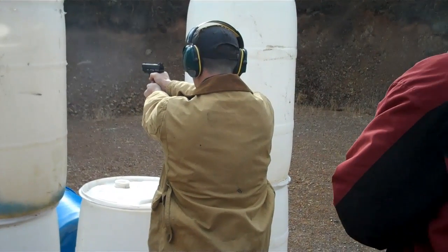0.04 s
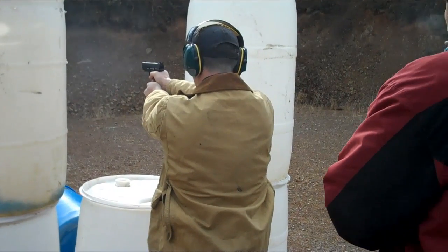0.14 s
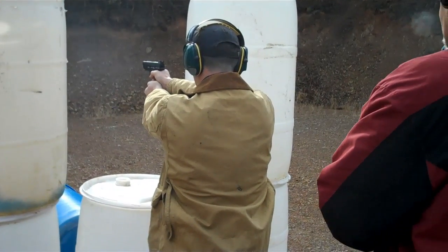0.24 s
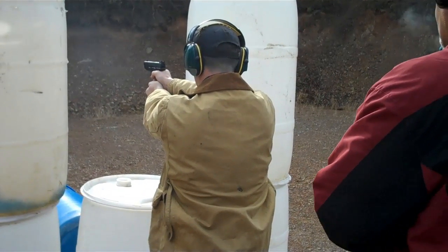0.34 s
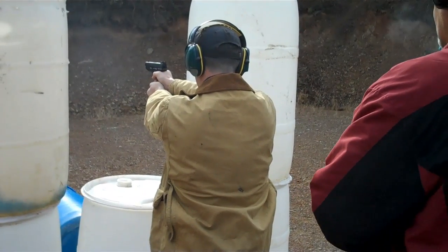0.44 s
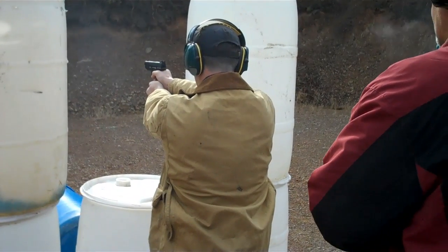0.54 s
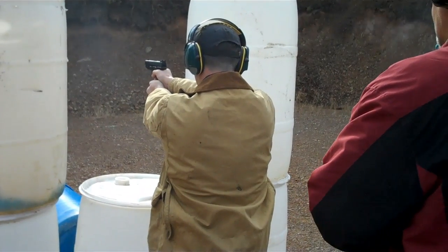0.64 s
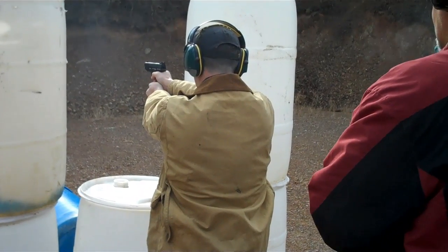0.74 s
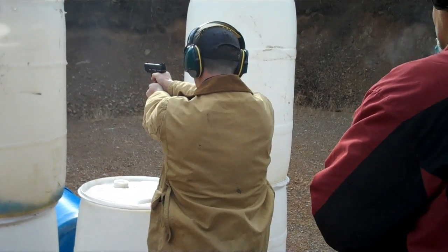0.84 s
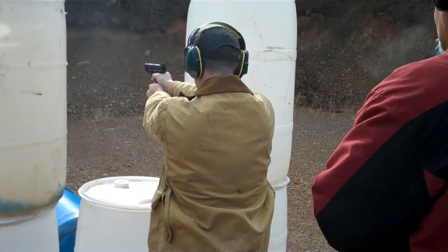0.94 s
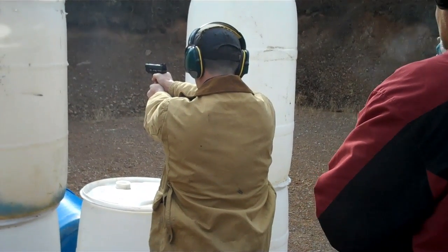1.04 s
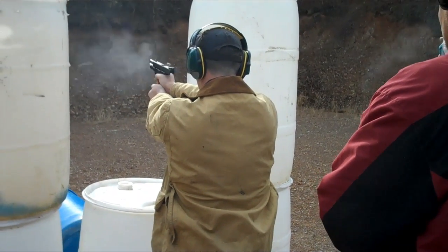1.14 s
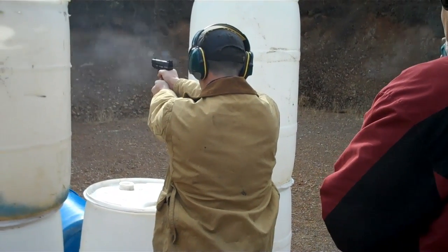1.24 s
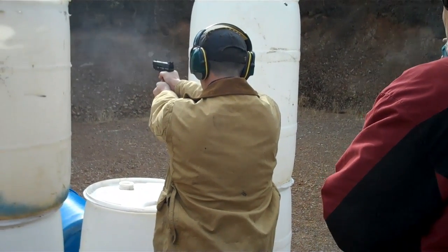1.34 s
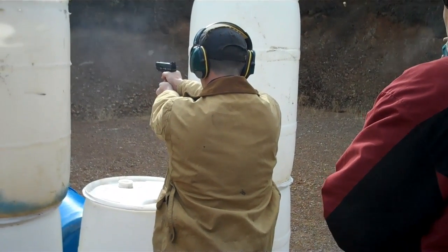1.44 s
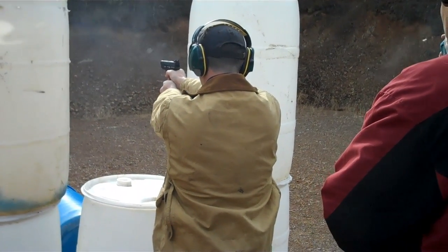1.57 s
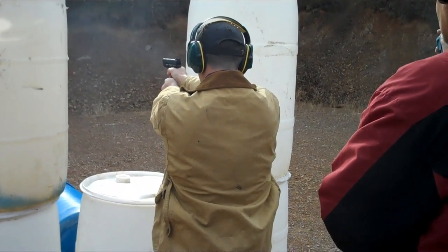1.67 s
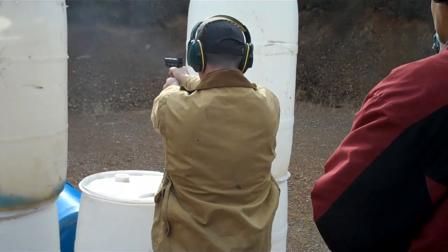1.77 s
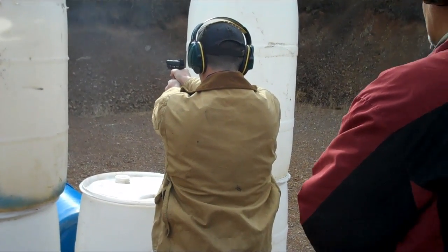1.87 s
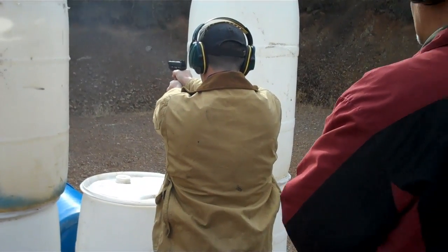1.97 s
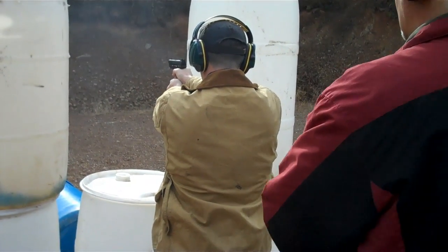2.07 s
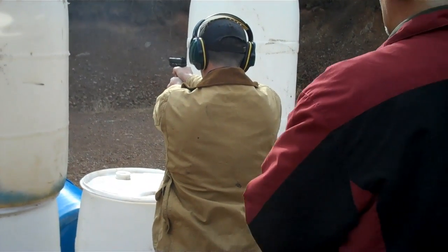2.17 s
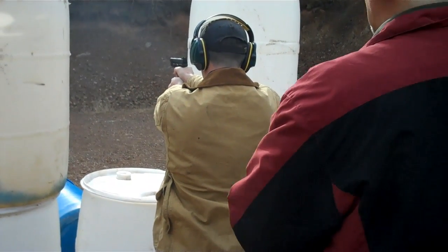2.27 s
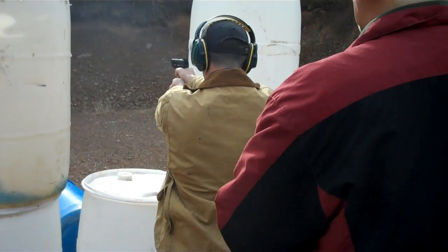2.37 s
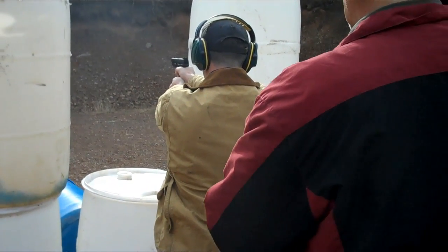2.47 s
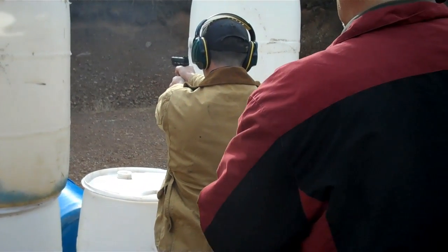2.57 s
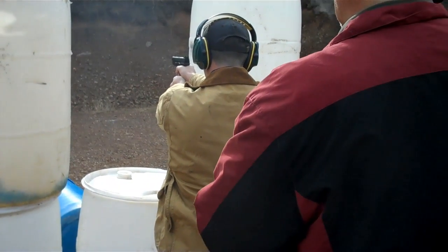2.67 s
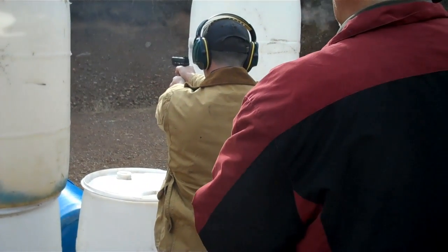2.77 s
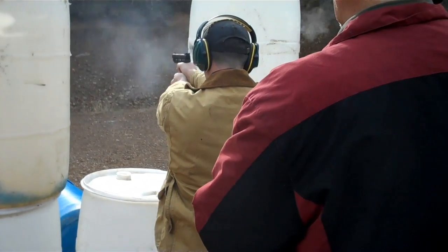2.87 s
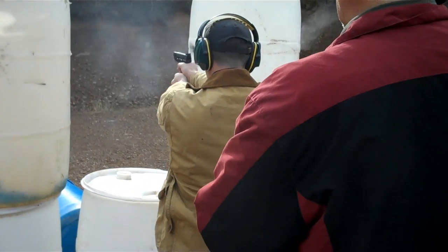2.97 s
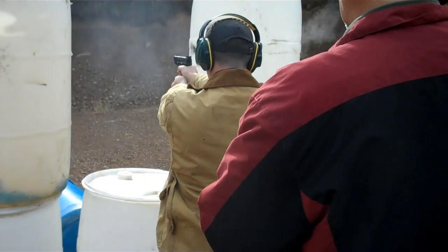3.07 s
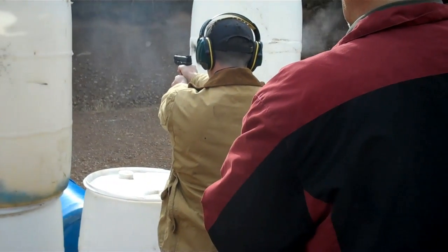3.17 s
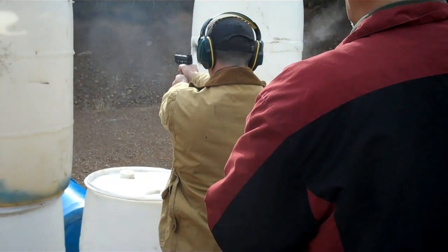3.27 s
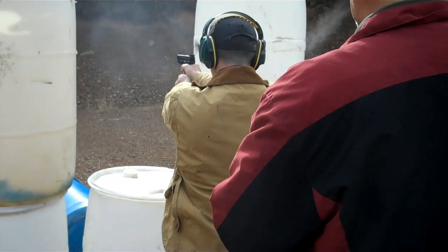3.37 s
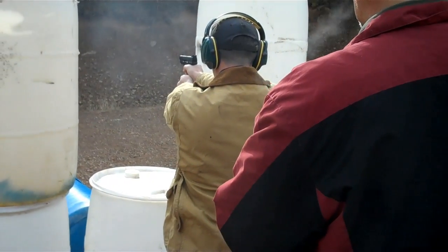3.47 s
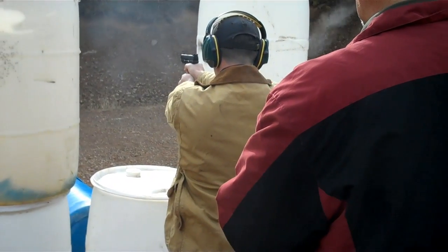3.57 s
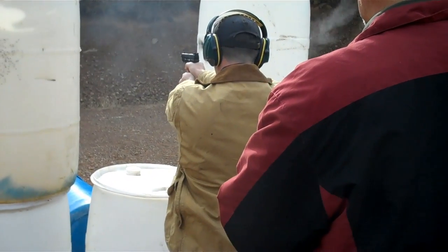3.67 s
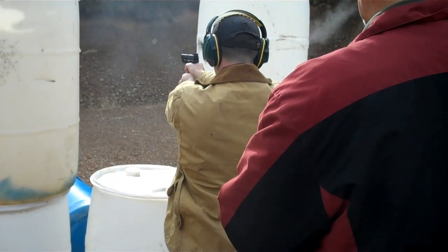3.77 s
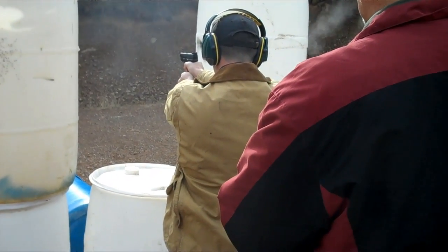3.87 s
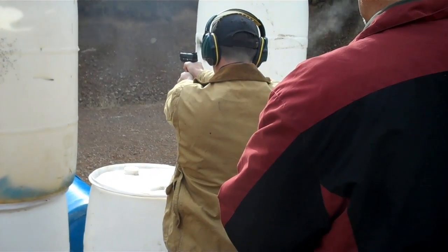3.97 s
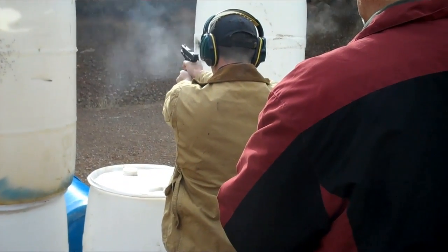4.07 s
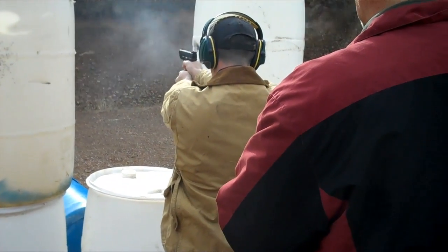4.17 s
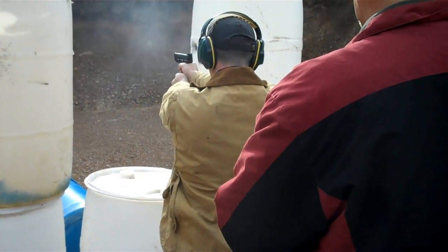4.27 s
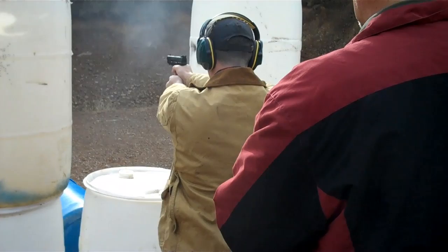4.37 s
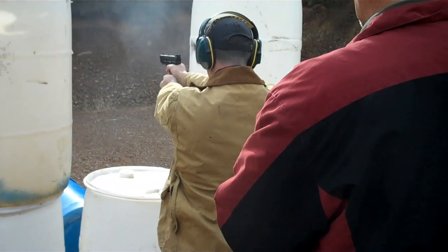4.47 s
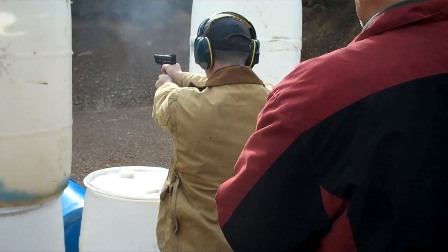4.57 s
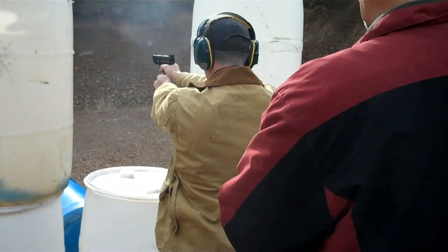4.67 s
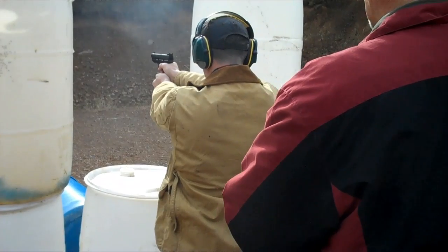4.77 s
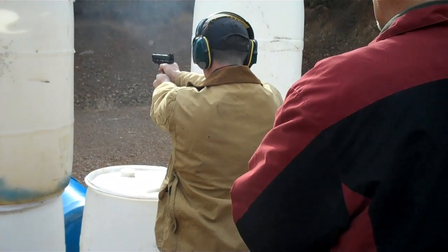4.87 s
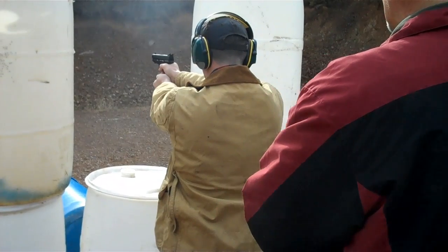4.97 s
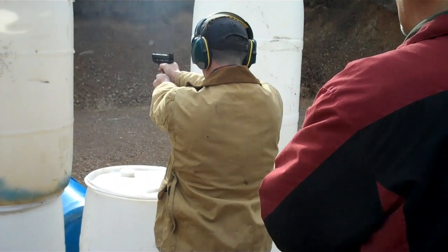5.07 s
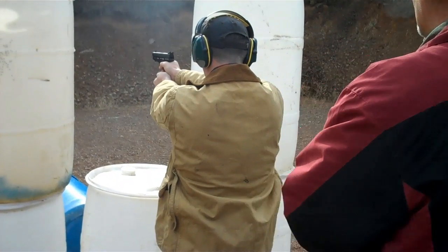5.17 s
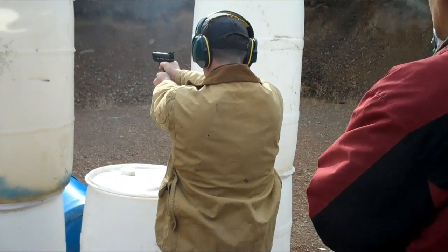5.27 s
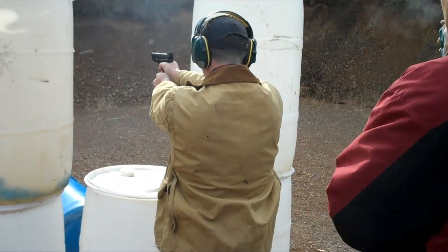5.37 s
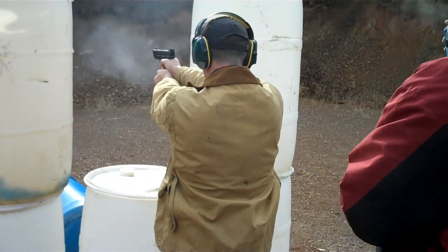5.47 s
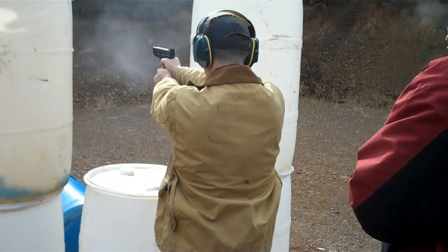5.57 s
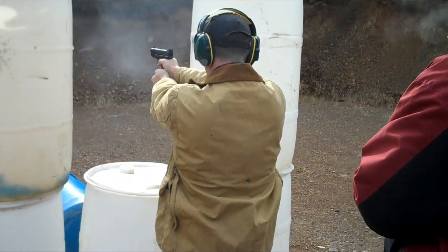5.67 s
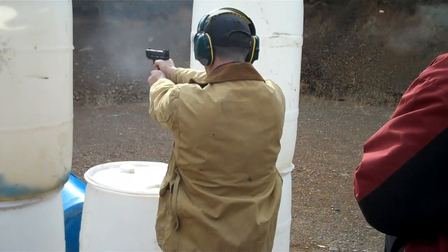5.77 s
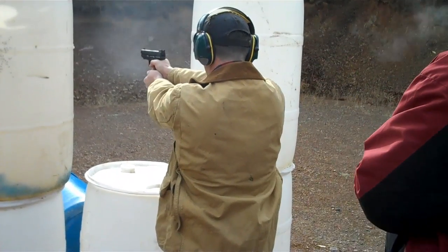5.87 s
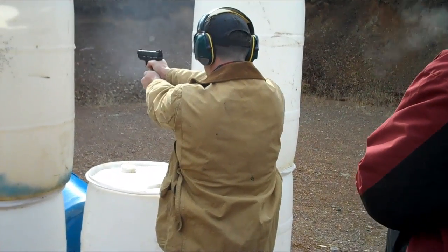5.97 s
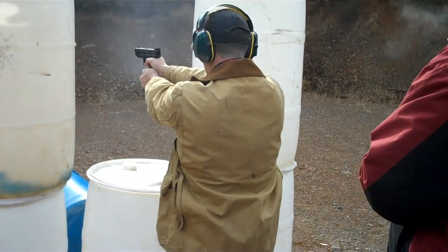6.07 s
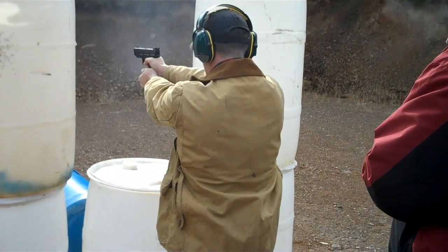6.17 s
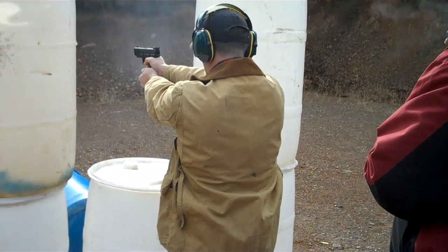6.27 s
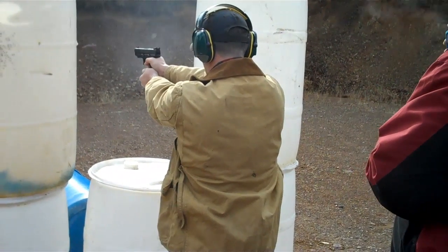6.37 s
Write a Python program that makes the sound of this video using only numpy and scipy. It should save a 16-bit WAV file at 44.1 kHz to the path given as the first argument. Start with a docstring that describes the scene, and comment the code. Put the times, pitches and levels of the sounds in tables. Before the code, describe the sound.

On an outdoor range, the roll of an earlier pistol shot is dying away. Four single shots follow, spaced over a second apart, each a harsh, overloaded blast with rapid slaps off nearby drums and banks, then a long roll that dulls as it fades. Ticks of grit and spent cases and small bumps fall between. A small stereo camera microphone close behind distorts and ducks after each blast.

```python
"""The roll of a pistol shot fired just before the start dies away, then four single shots follow.
Blasts are shaped noise bursts that slap back from drums and earth banks and return from the hills;
the roll is noise that dulls as it fades, and drums and steel ring on as decaying sines.
Noisy clicks are grit and spent cases on gravel, mode sums are bumps against the small camera;
hush and rustle lie behind, and the gain control drops after a blast and creeps back up."""
import sys
import numpy as np
from scipy import signal
from scipy.fft import rfft, irfft
from scipy.io import wavfile
from scipy.ndimage import uniform_filter1d

SR = 44100
rng = np.random.default_rng(int(sys.argv[2]) if len(sys.argv) > 2 else 0)


def transcribe(u):
    """Save the signal u as a 16-bit wav file named by the first command-line argument.

    u: samples, shape (n,) or (channels, n), limited to [-1, 1]; the rate is SR.
    q: integer samples, one column per channel.
    """
    v = np.clip(np.atleast_2d(u).T, -1, 1)
    q = np.round(v * 32767).astype(np.int16)
    wavfile.write(sys.argv[1], SR, q)


N = 283122
RANGE_SAMPLES, SMALL_SAMPLES = 2 * SR, 8000  # one shot's echoes, one small sound
STFT_SAMPLES = 512


def amp(db):
    """Amplitude factor of a level in dB."""
    return 10 ** (np.asarray(db) / 20)


def evened(x):
    """Scale to unit RMS."""
    return x / np.sqrt(np.mean(x ** 2) + 1e-20)


def peaked(x):
    """Scale to unit peak."""
    return x / np.max(abs(x))


def read(points, hz):
    """Interpolate a (Hz, value) curve over log frequency."""
    f, value = np.transpose(points)
    return np.interp(np.log(hz + 1), np.log(f + 1), value)


def fade(size, t60_s):
    """Exponential decay, 60 dB in t60_s."""
    return amp(-60 * np.arange(size) / SR / t60_s)


def add(mix, start_s, sound):
    """Mix in a stereo sound, cut at both ends of the mix."""
    at = round(start_s * SR)
    sound = sound[:, max(-at, 0):]
    part = mix[:, max(at, 0):][:, :sound.shape[1]]
    part += sound[:, :part.shape[1]]


# Each row: frequency in Hz, left-right likeness from 0 to 1.
STEREO_LIKENESS = [(60, 0.76), (180, 0.98), (550, 0.84), (1640, 0.54), (4960, 0.02), (14900, 0.05)]


def pair(size, alike):
    """Spectra of two noise channels, alike in the bass; alike scales the likeness."""
    hz = np.fft.rfftfreq(size, 1 / SR)
    left, other = rfft(rng.standard_normal((2, size)))
    same = np.clip(alike * read(STEREO_LIKENESS, hz), -1, 1)
    right = same * left + np.sqrt(1 - same ** 2) * other
    return hz, np.array([left, right])


# Each row: start in seconds, blast level in dB, left and right bias sag level in dB.
SHOTS = [(-.76, 8, 0, 0), (1.2197, 7.3, 3, 1), (2.8944, 6.8, 2.2, -3), (4.1351, 7.3, 2.2, -2),
         (5.4835, 7.3, 1.5, -2)]
# Each row, left then right capsule: sag start and end in seconds after the shot.
SAG_TIMES = [(.001, .0245), (.018, .026)]


def pistol():
    """All shots excite the same range and overload both capsules."""
    out = np.zeros((2, N))
    near = [pair(16384, NEAR_ALIKE)[1] for _ in near_returns()]
    far = [pair(32768, 1)[1] for _ in HILL_ECHOES]
    roll = pair(RANGE_SAMPLES, 1)[1]
    hop = STFT_SAMPLES // 2
    terrain = rng.standard_normal((hop + 1, RANGE_SAMPLES // hop + 2))  # frequency by time
    for start_s, blast_db, left_db, right_db in SHOTS:
        add(out, start_s, amp(blast_db) * echoes(near, far, roll, terrain))
        sags = [bias_sag(*times) for times in SAG_TIMES]
        add(out, start_s, amp([[left_db], [right_db]]) * sags)
    return out


def echoes(near, far, roll, terrain):
    """One shot as the range returns it: blast, slaps, hill echoes, roll and ringing drums."""
    out = np.zeros((2, RANGE_SAMPLES))
    add_near(out, near)
    add_hills(out, far)
    return out + rolling_tail(roll, terrain) + drum_rings()


REPEAT = .7  # amplitude share of the echo pattern common to all shots


def blended(common, alike):
    """The echo pattern shared by all shots, mixed with one of its own at equal total power."""
    hz, own = pair(2 * common.shape[-1] - 2, alike)
    return hz, REPEAT * common + np.sqrt(1 - REPEAT ** 2) * own


def burst(z, hz, colour, t60_s, tilt_db_per_octave, rise_s):
    """Coloured noise that rises and dies away."""
    tilt_db = tilt_db_per_octave * np.log2(hz / 1000 + .1)
    noise = evened(irfft(z * amp(read(colour, hz) + tilt_db)))
    t = np.arange(noise.shape[1]) / SR
    return noise * fade(len(t), t60_s) * (1 - np.exp(-t / rise_s))


# Slaps off drums and banks. Each row: delay in seconds, level in dB.
SLAPS = [(.016, -1.5), (.029, -5.5), (.047, -2.5), (.066, -8), (.086, -5), (.098, -11), (.114, -14)]
# Bright wash of the nearby ground: delay in seconds, level in dB, t60 in seconds, tilt in dB per octave.
GROUND_WASH = (.021, -14, .47, 3.3)
BLAST_T60_S, BLAST_TILT_DB_PER_OCTAVE = .085, 4.01
SLAP_T60_S, SLAP_TILT_DB_PER_OCTAVE = .056, -.8


def near_returns():
    """Direct blast, slaps and ground wash as rows of delay, level, t60 and tilt."""
    blast = (0, 0, BLAST_T60_S, BLAST_TILT_DB_PER_OCTAVE)
    slaps = [(delay_s, db, SLAP_T60_S, SLAP_TILT_DB_PER_OCTAVE) for delay_s, db in SLAPS]
    return [blast, *slaps, GROUND_WASH]


# Blast spectrum before tilt. Each row: frequency in Hz, relative level in dB per Hz.
BLAST_COLOUR = [(20, -14), (60, -7), (130, 0), (300, -4.5), (700, -2.5), (2000, -11), (4000, -16),
                (7500, -21.5), (9500, -29), (13500, -33), (14500, -60)]
NEAR_ALIKE = .35  # blast and close slaps differ widely between left and right
NEAR_RISE_S = .0018


def add_near(out, near):
    """The blast and its close reflections are fast bursts of wide noise."""
    for (delay_s, db, t60_s, tilt), common in zip(near_returns(), near):
        hz, z = blended(common, NEAR_ALIKE)
        add(out, delay_s, amp(db) * burst(z, hz, BLAST_COLOUR, t60_s, tilt, NEAR_RISE_S))


# Banks and hills further off.
# Each row: delay in seconds, level in dB, t60 in seconds, tilt in dB per octave, rise in seconds.
HILL_ECHOES = [(.18, -37, .2, 2.5, .008), (.26, -37, .2, 1.5, .008), (.375, -33, .1, .4, .004),
               (.602, -31.5, .25, -.8, .006), (.63, -36, .9, 1.8, .05), (.74, -36, .06, .4, .003)]
# Far echoes, dulled by the air, before tilt. Each row: frequency in Hz, relative level in dB per Hz.
HILL_COLOUR = [(40, -30), (120, -7), (300, -19), (600, -11), (900, 0), (1300, -9), (2000, -13), (4000, -25),
               (8000, -42), (14000, -58)]


def add_hills(out, far):
    """Distant slopes return late bursts with little treble."""
    for (delay_s, db, t60_s, tilt, rise_s), common in zip(HILL_ECHOES, far):
        hz, z = blended(common, 1)
        add(out, delay_s, amp(db) * burst(z, hz, HILL_COLOUR, t60_s, tilt, rise_s))


# Starting spectrum of the roll. Each row: frequency in Hz, relative level in dB per Hz.
ROLL_COLOUR = [(40, -26), (120, -4), (300, -5), (800, -1.5), (2000, -4), (4000, -10), (7500, -13),
               (9500, -23), (14000, -40), (14500, -60)]
# Decay of the roll. Each row: frequency in Hz, t60 in seconds.
ROLL_T60 = [(60, 1.05), (200, 1.6), (800, 1.95), (2000, 1.8), (5000, 1.15), (9000, .75), (14000, .45)]
ROLL_DB, LUMPY_DB = -21.5, 1.6  # level, RMS unevenness


def rolling_tail(roll, terrain):
    """Noise dulls because treble decays fastest; uneven ground returns it in lumps."""
    hz, z = blended(roll, 1)
    noise = evened(irfft(z * amp(read(ROLL_COLOUR, hz))))
    f, t, field = signal.stft(noise, SR, nperseg=STFT_SAMPLES)
    lumps = uniform_filter1d(terrain, size=3, axis=1)
    lumps = evened(uniform_filter1d(lumps, size=12, axis=0))
    decay_db = -60 * t / read(ROLL_T60, f)[:, None]
    field = field * amp(ROLL_DB + LUMPY_DB * lumps + decay_db)
    return signal.istft(field, SR, nperseg=STFT_SAMPLES)[1][:, :RANGE_SAMPLES]


# Drums and steel. Each row: frequency in Hz, level in dB relative to RING_DB, t60 in seconds.
DRUM_MODES = [(186, 2.5, 1.6), (361, -8, 1.5), (581, -1.2, 1.5), (807, -10, 1.4), (1007, -13, 2.2),
              (1497, -19, 3.6), (1760, -23, 2.2)]
RING_DB, RING_RISE_S = -26.5, .43


def drum_rings():
    """Decaying sines swell slowly, as the returning echoes keep feeding them."""
    t = np.arange(RANGE_SAMPLES) / SR
    rings = sum(amp(RING_DB + db) * fade(RANGE_SAMPLES, t60_s) * np.sin(2 * np.pi * hz * t)
                for hz, db, t60_s in DRUM_MODES)
    return rings * (1 - np.exp(-(t / RING_RISE_S) ** 2))


def bias_sag(start_s, end_s):
    """The overloaded capsule sags for a moment, then snaps back and overshoots."""
    t = np.arange(SMALL_SAMPLES) / SR
    down, up = (1 / (1 + np.exp(-(t - edge_s) / .0008)) for edge_s in (start_s, end_s))
    overshoot = .45 * np.exp(-np.maximum(t - end_s, 0) / .02)
    return up * (1 + overshoot) - down


TICK_T60_S, SNAP_T60_S, SNAP_SHARE = .017, .004, .45
TICK_WIDTH_HZ = 3600  # of each resonator pass


def click(db, hz, pan_db):
    """A sharp snap and a short noisy rattle, resonated twice around one colour."""
    noise = rng.standard_normal(SMALL_SAMPLES)
    r = np.exp(-np.pi * TICK_WIDTH_HZ / SR)
    poles = [1, -2 * r * np.cos(2 * np.pi * hz / SR), r * r]
    rattle = signal.lfilter([1], poles, noise)
    rattle = evened(signal.lfilter([1, -1], poles, rattle)) * fade(SMALL_SAMPLES, TICK_T60_S)
    snap = SNAP_SHARE * noise * fade(SMALL_SAMPLES, SNAP_T60_S)
    pan = amp([[pan_db / 2], [-pan_db / 2]])  # positive is left
    return amp(db) * pan * peaked(rattle + snap)


# Spent cases landing. Each row: start in seconds, click peak in dB before pan, colour in Hz,
# pan in dB, brass ring level in dB, ring frequency in Hz.
CASES = [(2.1081, -27, 7180, 1.1, -49, 10850), (2.3224, -55, 7330, 1.1, -61, 10850),
         (3.8077, -31, 6170, -2.1, -59, 11100), (6.3638, -15, 5930, -1.0, -50, 11100)]
BRASS_T60_S, BRASS_BEAT_HZ = .22, 45


def spent_cases():
    """Each landing is a click and a high brass ring of two beating tones."""
    out, t = np.zeros((2, N)), np.arange(SMALL_SAMPLES) / SR
    for start_s, db, hz, pan_db, ring_db, ring_hz in CASES:
        beat = np.cos(np.pi * BRASS_BEAT_HZ * t)
        tone = np.sin(2 * np.pi * ring_hz * t) * beat
        ring = amp(ring_db) * tone * fade(SMALL_SAMPLES, BRASS_T60_S)
        add(out, start_s, click(db, hz, pan_db) + ring)
    return out


# Grit, buckles and the gun's action.
# Each row: start in seconds, peak in dB before pan, colour in Hz, pan in dB.
TICKS = [(0.1421, -38, 7100, 1.1), (0.2553, -44, 5160, -1.5), (0.376, -44, 7300, -2.1),
         (0.4584, -43, 5390, -1.1), (0.7996, -49, 6500, -1.5), (0.9283, -49, 5000, -3.0),
         (1.1917, -39, 5630, -1.5), (2.1134, -37, 7240, 6.0), (2.1475, -37, 5610, -0.6),
         (2.173, -43, 7050, 1.5), (2.2463, -37, 6890, 3.0), (2.5501, -36, 4700, 1.1),
         (2.7771, -42, 6930, 1.1), (3.5694, -39, 6500, 1.1), (4.0916, -36, 5850, 0.0),
         (4.7794, -41, 7000, 1.1), (4.9694, -46, 8000, -0.6), (5.1507, -40, 4950, -2.1),
         (5.3213, -38, 3910, 0.6), (5.4281, -41, 7000, 2.1), (5.452, -41, 5000, 0.0),
         (6.3674, -21, 5950, -1.5), (6.3944, -39, 6930, -3.5)]
FAINT_COUNT, FAINT_DB, FAINT_SPREAD_DB = 16, -52, 3
FAINT_LOW_HZ, FAINT_HIGH_HZ, FAINT_PAN_DB = 3500, 7000, 1.5


def ticks():
    """Small clicks at set times, and quieter ones that fall at random."""
    out = np.zeros((2, N))
    when, size, colour, side = rng.random((FAINT_COUNT, 4)).T
    faint_db = FAINT_DB + FAINT_SPREAD_DB * (2 * size - 1)
    faint_hz = FAINT_LOW_HZ + colour * (FAINT_HIGH_HZ - FAINT_LOW_HZ)
    faint = zip(when * N / SR, faint_db, faint_hz, FAINT_PAN_DB * (2 * side - 1))
    for start_s, *row in [*TICKS, *faint]:
        add(out, start_s, click(*row))
    return out


# Bumps against the camera. Each row: start in seconds, peak in dB, t60 in seconds at 430 Hz.
KNOCKS = [(.2545, -27, .035), (.375, -38, .04), (2.109, -29, .015), (3.808, -33, .015), (3.935, -36, .021),
          (5.109, -13, .03)]
# Camera body modes. Each row: frequency in Hz, relative level in dB.
BODY_MODES = [(195, -10), (410, -4), (640, 4), (1110, -3), (1700, -6), (2400, -9), (3200, -8)]
KNOCK_RISE_S = .0001


def knocks():
    """Each bump excites the body modes; higher modes die sooner."""
    out, t = np.zeros((2, N)), np.arange(SMALL_SAMPLES) / SR
    for start_s, db, t60_s in KNOCKS:
        bump = np.zeros(SMALL_SAMPLES)
        for hz, mode_db in BODY_MODES:
            decay = fade(SMALL_SAMPLES, t60_s * (430 / hz) ** .85)
            bump -= amp(mode_db) * np.sin(2 * np.pi * hz * t) * decay
        bump = bump * (1 - np.exp(-t / KNOCK_RISE_S))
        add(out, start_s, amp(db) * peaked(np.array([bump, bump])))
    return out


# Cloth and feet on gravel. Each row: time in seconds, level in dB.
RUSTLE = [(0, -65), (.9, -70), (2.5, -65), (3.9, -61), (6.42, -59)]
# A foot drags. Each row: start in seconds, length in seconds, added level in dB.
SCUFFS = [(.362, .115, -55), (2.86, .05, -58)]
SCUFF_EDGE_S, GRAINS_PER_S = .035, 1500


def rustle():
    """Sparse random grains of uneven strength, band-passed; scuffs raise their level."""
    strength = amp(2.6 * np.minimum(rng.exponential(1, N), 5))
    present = rng.random(N) < GRAINS_PER_S / SR
    grains = strength * present * rng.standard_normal((2, N))
    band = signal.butter(2, [1500, 7000], "band", fs=SR, output="sos")
    grains = evened(signal.sosfilt(band, grains))
    t = np.arange(N) / SR
    level = amp(np.interp(t, *np.transpose(RUSTLE)))
    for start_s, length_s, db in SCUFFS:
        to_edge_s = np.minimum(t - start_s, start_s + length_s - t)
        level = level + amp(db) * np.clip(to_edge_s / SCUFF_EDGE_S, 0, 1)
    return grains * level


# Hush spectrum. Each row: frequency in Hz, relative level in dB per Hz.
AIR_COLOUR = [(20, -40), (30, -17), (75, -9), (163, 2.5), (320, -11), (950, -1.5), (1500, -8), (2500, -16),
              (3500, -23), (6000, -32), (8500, -31), (13900, -31), (15000, -70)]
AIR_DB = -51


def air():
    """Distant outdoor hush: steady shaped noise."""
    hz, z = pair(N, 1)
    return amp(AIR_DB) * evened(irfft(z * amp(read(AIR_COLOUR, hz)), N))


def scene():
    """Shots, small sounds close by, and background."""
    return pistol() + spent_cases() + ticks() + knocks() + rustle() + air()


# Microphone ports, left then right. Each row: resonance in Hz, width in Hz, level in dB.
PORTS = [(7400, 1500, 4), (5800, 900, 10.5)]
THRESHOLD_DB, GAIN_SLOPE = -6, .9  # gain cut in dB per dB over threshold
LEVEL_FALL_DB_PER_S, GAIN_SMOOTH_S = 28, .04
CLIP_LEVEL, EDGE_HZ = .93, 15550


def record(dry):
    """Port resonances, gain control that falls after a blast and creeps back, clipping, band limit."""
    hz = np.fft.rfftfreq(N, 1 / SR)
    ports = [1 + amp(db) * 1j * hz * width / (f * f - hz * hz + 1j * hz * width)
             for f, width, db in PORTS]
    x = irfft(rfft(dry) * ports, N)
    power = uniform_filter1d((x ** 2).mean(0), size=200, origin=99)  # over the last samples
    power_db = 10 * np.log10(abs(power) + 1e-12)
    fall_db = np.arange(N) * LEVEL_FALL_DB_PER_S / SR
    held_db = np.maximum.accumulate(power_db + fall_db) - fall_db  # peak hold with steady fall
    over_db = np.maximum(held_db - THRESHOLD_DB, 0)
    r = np.exp(-1 / (GAIN_SMOOTH_S * SR))  # the gain needs a moment to come down
    cut_db = GAIN_SLOPE * signal.lfilter([1 - r], [1, -r], over_db)
    x = np.clip(x / amp(cut_db), -CLIP_LEVEL, CLIP_LEVEL)
    low_pass = signal.firwin(511, EDGE_HZ, window=("kaiser", 9), fs=SR)
    return signal.oaconvolve(x, low_pass[None], "same")


dry = scene()
out = record(dry)
transcribe(out)
```